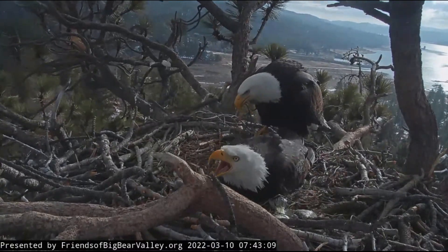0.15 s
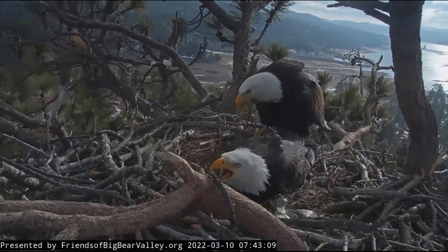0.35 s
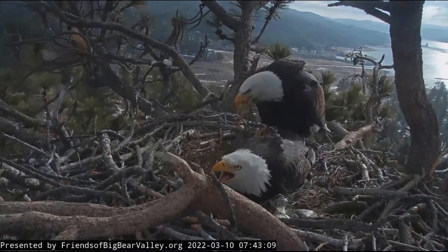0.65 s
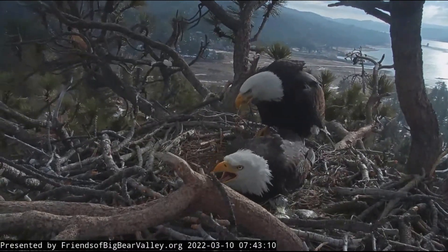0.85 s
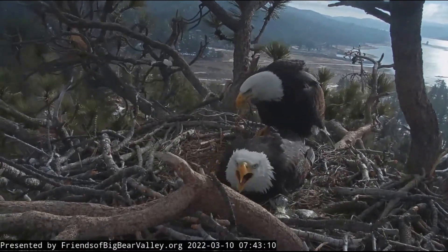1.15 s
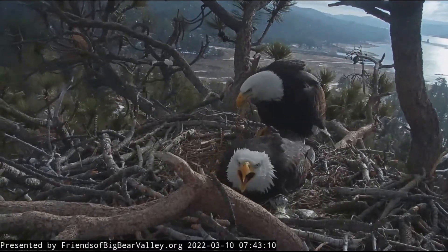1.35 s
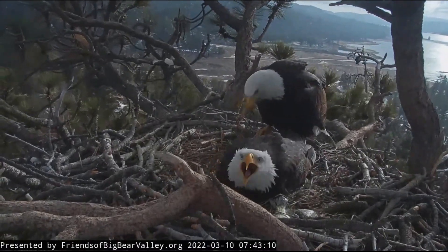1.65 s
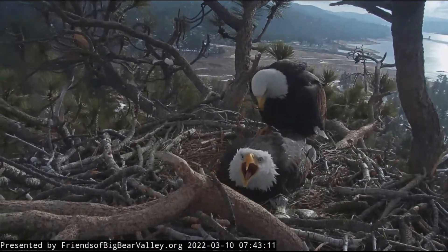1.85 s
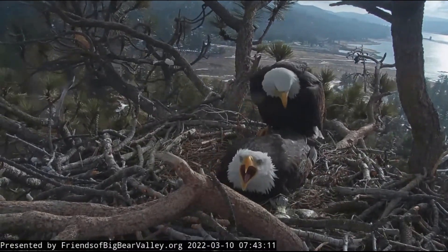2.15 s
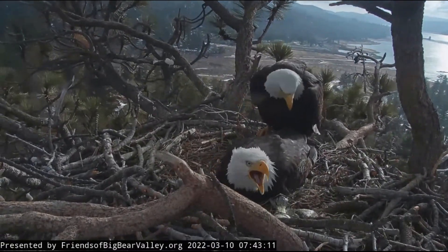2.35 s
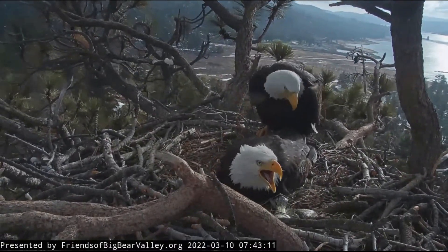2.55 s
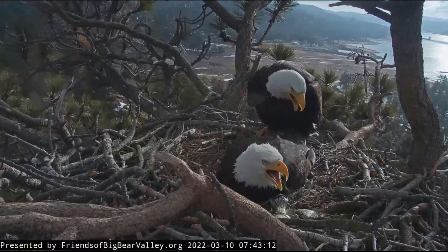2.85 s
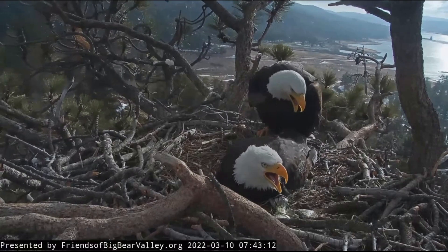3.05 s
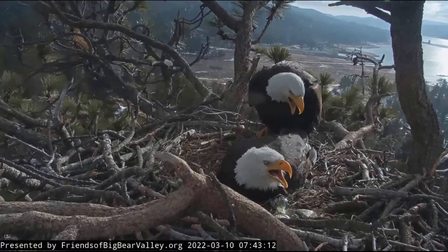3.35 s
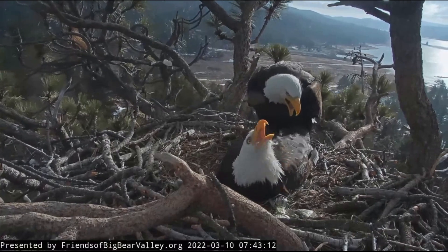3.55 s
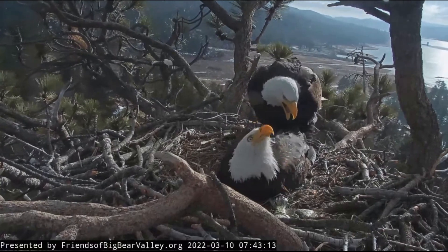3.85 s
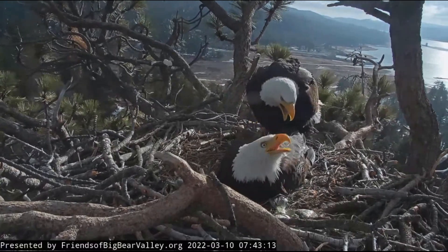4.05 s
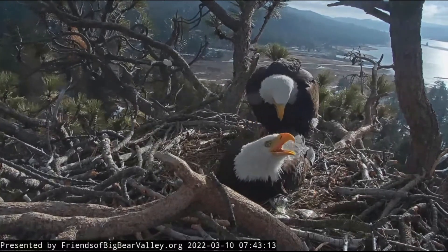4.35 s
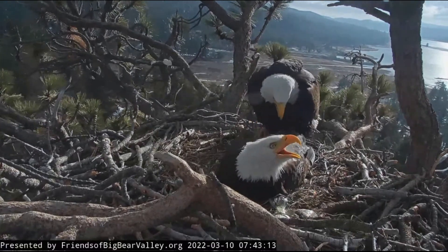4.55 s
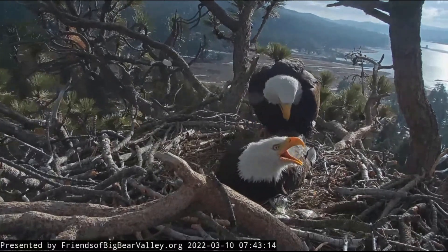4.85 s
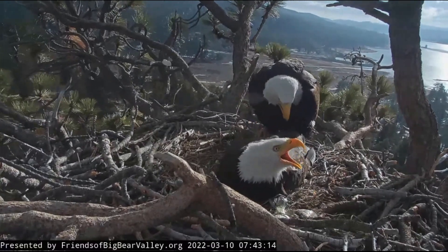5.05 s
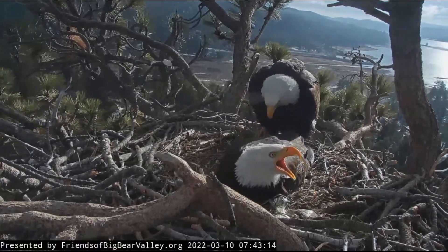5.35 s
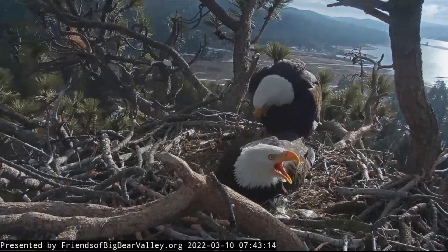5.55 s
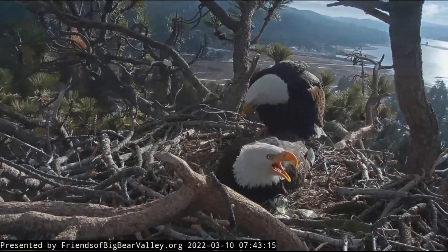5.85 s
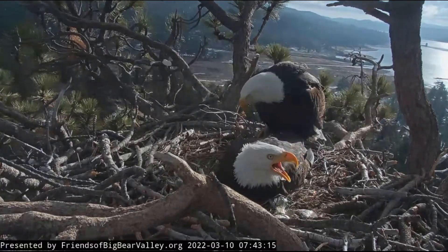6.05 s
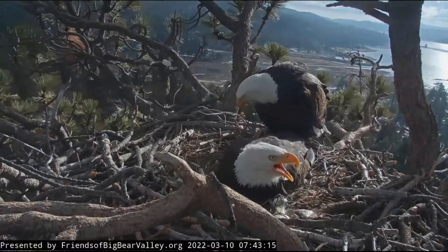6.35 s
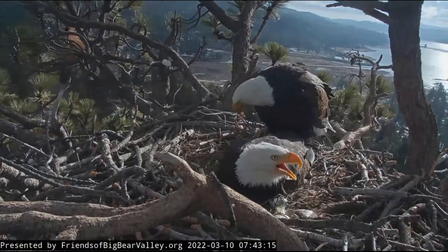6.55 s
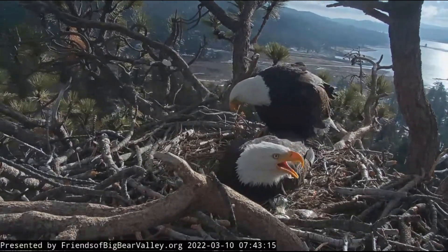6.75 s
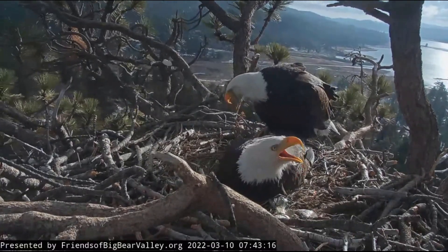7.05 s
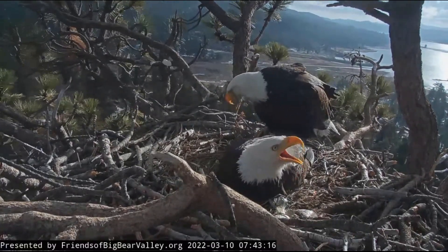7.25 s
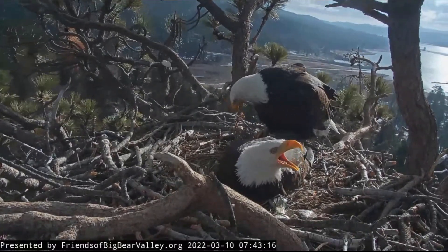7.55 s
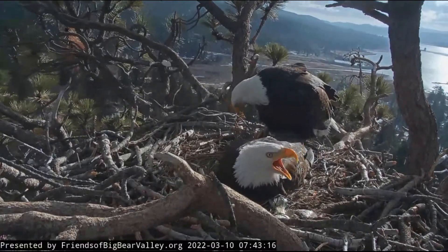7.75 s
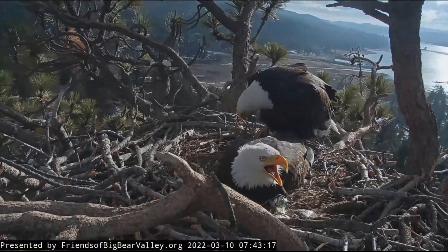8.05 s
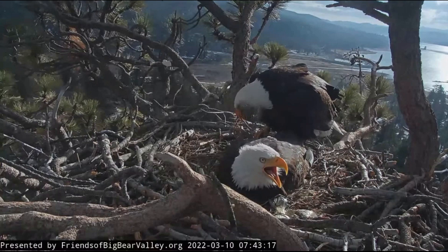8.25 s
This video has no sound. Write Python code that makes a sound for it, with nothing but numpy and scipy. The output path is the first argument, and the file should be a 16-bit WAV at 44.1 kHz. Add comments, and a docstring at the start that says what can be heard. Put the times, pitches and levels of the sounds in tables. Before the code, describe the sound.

A close outdoor microphone at a treetop nest catches an eagle whose loudest notes overdrive it. From 0.1 to 0.7 s, two thin whistles lead into six rapid raspy chirps, about ten a second, falling from squeal to croak, with small peeps after. Wind rumble and airy rush swell; sticks tick in quick runs near 1.5 s. At 2.2 s a clear high whistle starts a louder bout, ending in piercing peeps by 3 s as the gust peaks. Hoarse short yelps come at 3.2 and 3.5 s, then a brief harsh chirp burst at 3.7 s with a low rough clack. Yelps and faint squeaks continue from 4 to 5 s among twig clicks. The strongest chatter runs 5.4 to 6.3 s with sharp peeps; a weak chirp follows at 6.5. Wind eases and sticks tick. At 7.6 s a bright whistle opens the final raspy bout, peeping until 8.4 s.

```python
"""In a tall pine an eagle calls on its nest, close to a fixed microphone that its loudest notes overdrive.
High whistles, near-pure tones, lead into bouts of raspy chirps: paired pitch sweeps with a throat-filtered rasp.
The chirps sink from a squeal to a croak, and most bouts end in piercing peeps, arching tones.
Lower yelps, built from odd and then even harmonics, and faint squeaks come mostly between the bouts.
Filtered noise makes the wind's rush and rumble; decaying noise bursts make the nest's sticks tick, clack and crack."""
import sys
import numpy as np
from scipy import signal
from scipy.fft import rfft, irfft, next_fast_len
from scipy.io import wavfile
from scipy.ndimage import uniform_filter1d, map_coordinates

SR = 44100
rng = np.random.default_rng(int(sys.argv[2]) if len(sys.argv) > 2 else 0)


def output_pcm(signal):
    """Save a mono or channel-first signal as 16-bit PCM at the path in sys.argv[1].

    Samples are clipped to [-1, 1] before scaling.
    """
    pcm = np.clip(np.atleast_2d(signal).T, -1, 1) * 32767
    wavfile.write(sys.argv[1], SR, np.round(pcm).astype(np.int16))


N = 371322

# Wind pressure on the microphone. Each row: time in seconds, level in dB.
BUFFET_LEVELS = [(0, -78), (.33, -62.5), (.6, -46.5), (.8, -53.5), (1.05, -47.5), (1.6, -44.5),
                 (2.15, -50.5), (2.47, -43), (3.02, -40), (3.27, -48), (3.7, -59), (4.0, -49), (4.25, -54),
                 (4.6, -51), (5.5, -55.5), (5.87, -51.5), (6.5, -59), (8.42, -63)]
# Wind in the crown. Each row: time in seconds, level in dB.
BREEZE_LEVELS = [(0, -56.5), (.7, -52), (1.1, -50.5), (1.62, -45), (2.05, -48), (2.45, -46), (2.95, -43.5),
                 (3.4, -49.5), (4.2, -53.5), (4.7, -52.5), (5.2, -54.5), (5.8, -53.5), (6.9, -58),
                 (8.42, -53.5)]
# Noise spectrum of strong buffeting. Each row: frequency in Hz, relative density in dB.
RUMBLE_SPECTRUM = [(20, -31), (35, 1), (60, -6.5), (90, -1), (160, -5.5), (250, -15.5), (500, -27.5),
                   (900, -46)]
# Noise spectrum of air rushing through the crown. Each row: frequency in Hz, relative density in dB.
RUSH_SPECTRUM = [(180, -38), (300, -13.5), (477, -10), (630, -6.5), (823, -5.5), (1010, -4.5), (1610, -6.5),
                 (2280, -5), (2880, 0.5), (3090, -1), (4800, -30), (6240, -81), (10600, -120)]
# Noise spectrum of the hissing needles. Each row: frequency in Hz, relative density in dB.
NEEDLE_SPECTRUM = [(3500, -7), (4600, -7), (5800, 4), (7200, -12.5), (8500, -16), (13000, -30),
                   (15000, -38)]
# Noise spectrum of the steady microphone hiss. Each row: frequency in Hz, relative density in dB.
MIC_HISS_SPECTRUM = [(100, 19.5), (8000, 1.5), (13500, 1), (14500, -23), (15300, -37)]
# Single ticks and cracks of the sticks. Each row: start in seconds, level in dB, extra level of the tick in dB.
STICK_HITS = [(0.0523, -39.5, -3.5), (1.8083, -34, -13), (4.2028, -34, -9.5), (4.9107, -35.5, -7),
              (5.0669, -32.5, -6.5), (6.5226, -34.5, -26), (6.5944, -35, -8.5), (6.837, -54, 2),
              (7.383, -41, -22), (7.5044, -34, -8.5)]
# Quick runs of stick ticks, or of low rough clacks. Each row: start in seconds, number of hits, gap in seconds,
# level in dB, extra level of the tick in dB.
STICK_RUNS = [(1.4536, 4, .0408, -33.5, -6.5), (1.606, 4, .0415, -31, -7.5), (3.8018, 4, 0.011, -23, -47)]
# Noise spectrum of a thin stick's tick. Each row: frequency in Hz, relative density in dB.
TWIG_SPECTRUM = [(2500, 1), (4300, 6), (6500, 5), (7400, 1), (8200, -18), (14000, -29)]
# Noise spectrum of sticks knocking. Each row: frequency in Hz, relative density in dB.
KNOCK_SPECTRUM = [(100, -16), (700, -15.5), (1500, -10), (2600, 0), (3300, -1), (4500, -34)]
# Whistles. Each row: start in seconds, length in seconds, first pitch in Hz, last pitch in Hz, level in dB.
WHISTLE_NOTES = [(0.069, 0.039, 4185, 4013, -31), (0.099, 0.053, 4130, 4050, -34),
                 (0.552, 0.018, 5640, 5160, -46), (0.561, 0.022, 4050, 3480, -47),
                 (2.212, 0.042, 4430, 4100, -49), (2.244, .04, 4050, 3885, -23),
                 (2.624, 0.026, 4060, 4200, -35), (2.735, 0.048, 4180, 3860, -32),
                 (3.675, 0.034, 3540, 4056, -29), (3.697, .028, 5000, 4920, -47.5),
                 (3.717, 0.0198, 3490, 3000, -31), (3.735, 0.05, 2400, 2570, -40),
                 (5.375, 0.043, 5150, 5900, -59), (5.377, 0.068, 4760, 4500, -44.5),
                 (5.768, 0.043, 4240, 3970, -45.5), (5.881, 0.044, 4190, 3950, -29.5),
                 (6.006, 0.041, 4090, 4130, -37), (7.546, .06, 1290, 1384, -44.5),
                 (7.598, 0.07, 3970, 4170, -23), (7.662, 0.0083, 3970, 3740, -28),
                 (7.915, 0.019, 4150, 4310, -33), (8.03, 0.039, 4245, 4200, -25.5)]
# Raspy chirps. Each row: time in seconds, strength in dB.
CHIRP_NOTES = [(0.147, -5.5), (0.241, -5), (0.338, -7), (0.442, -6), (0.546, -11.5), (0.659, -7.5),
               (2.3, -3.5), (2.397, -2.5), (2.498, -1.5), (2.614, 1), (2.737, -1), (2.857, 0), (3.689, -2),
               (3.727, -5.5), (3.785, 2), (5.435, -3.5), (5.459, 2.5), (5.551, 2.5), (5.652, .5),
               (5.762, 3.5), (5.883, 1), (5.907, -2.5), (6.004, 2), (6.121, -0.5), (6.246, -9.5),
               (6.494, -9.5), (7.703, 1.5), (7.804, 0.5), (7.915, -1), (8.031, 4), (8.057, -10.5),
               (8.163, 0), (8.298, -6.5)]
# Bouts of chatter. Each row: start in seconds, time until the voice drops in seconds, squeal and rasp gain in dB.
CHATTER_BOUTS = [(0.1, 0.23, 2), (2.251, 0.26, 1), (3.75, .12, -10.5), (5.401, 0.31, -3), (7.652, 0.23, -1)]
# Resonances of windpipe and open beak. Each row: centre in Hz, width in Hz, gain in dB.
THROAT_RESONANCES = [(2235, 25, 5.5), (2815, 464, 1.5), (3310, 150, 5), (4200, 160, 2), (5160, 43, 3.5),
                     (5960, 230, 11), (6950, 300, 12.5)]
# Peeps, from faint squeaks to piercing cries. Each row: start in seconds, length in seconds, pitch in Hz, level in dB.
PEEP_NOTES = [(0.663, 0.027, 3368, -19.5), (0.778, 0.015, 3270, -20), (2.852, 0.046, 3267, -15.5),
              (2.978, 0.013, 3235, -22.5), (3.037, 0.072, 3114, -37), (3.15, 0.048, 3530, -44),
              (3.474, 0.033, 3300, -41), (3.499, 0.026, 3580, -44.5), (4.228, 0.021, 3260, -38),
              (4.388, 0.021, 3190, -42.5), (4.739, 0.022, 3110, -45.5), (5.242, .043, 3030, -42.5),
              (5.28, 0.022, 3116, -40.5), (5.309, 0.017, 2230, -45), (5.353, 0.02, 1430, -50),
              (5.875, 0.031, 3310, -27), (6.004, 0.033, 3340, -14), (6.126, 0.035, 3244, -14),
              (6.252, 0.018, 3210, -16.5), (8.156, 0.058, 3425, -15), (8.298, 0.045, 3247, -12)]
# Yelps. Each row: start in seconds, length in seconds, last pitch in Hz, odd-harmonic level in dB,
# even-harmonic level in dB, extra gain of the second harmonic in dB.
YELP_NOTES = [(3.198, 0.0364, 560, -33, -32, 1.5), (3.546, 0.087, 537, -33, -31, -0.5),
              (3.967, 0.045, 490, -40.5, -33, -5), (4.281, 0.045, 590, -35, -47.5, 3),
              (4.414, 0.061, 604, -28.5, -26, -10.5), (4.78, 0.068, 710, -39, -62, 2),
              (4.895, 0.1, 745, -45, -66, 0), (4.983, 0.0408, 480, -40.5, -34.5, -6),
              (6.354, 0.0227, 604, -57, -31.5, 2), (7.532, 0.023, 644, -61, -42, 7),
              (7.554, .028, 715, -59, -37.5, 4)]
# Odd harmonics of a yelp. Each row: harmonic number, relative level in dB.
YELP_ODD_HARMONICS = [(3, -8), (5, -3), (7, -33), (9, -27), (11, -53)]
# Even harmonics of a yelp. Each row: harmonic number, relative level in dB.
YELP_EVEN_HARMONICS = [(2, -5.5), (4, 2.5), (6, -22.5), (8, -30), (10, -31)]
# Echoes from trunk and branches. Each row: delay in seconds, level in dB.
BRANCH_ECHOES = [(.0085, -13), (0.0146, -48), (0.02, -25.5)]

DROP_S = 0.0384  # how gradually the voice drops within a bout
SQUEAL_HZ, SQUEAL_DROP_HZ = 6143, 848  # pitch of the early squeals, and how far it sinks
# after the drop the squeal dies first, the rasp later
SQUEAL_FADE_DB_PER_S, RASP_FADE_DB_PER_S, RASP_HOLD_S = 132, 54, 0.032
CROAK_GAIN_DB = 6.5  # the croak takes over as the voice drops
PEEP_SAG = 0.055  # share of its pitch that a peep loses by its end
YELP_HZ = 651.5  # every yelp starts from this pitch
TOP_HZ = 15850  # upper band limit of the microphone signal


def amp(db):
    """Level law: decibels to amplitude gain."""
    return 10 ** (np.asarray(db) / 20)


def unit(x):
    """Normalisation: scale to rms 1."""
    return x / np.sqrt(np.mean(x ** 2) + 1e-20)


def add(track, s, sound):
    """Superposition: mix a sound into the track at s seconds."""
    i = max(round(s * SR), 0)
    track[i:i + len(sound)] += sound[:len(track) - i]


def wobble(rate, n):
    """Band-limited fluctuation: a smooth random curve with rate knots a second."""
    knots = rng.standard_normal(int(n * rate / SR) + 4)
    return map_coordinates(knots, [np.arange(n) * rate / SR])


def filtered(x, response):
    """Linear filtering: the spectrum of x times a response of frequency."""
    m = next_fast_len(len(x) + SR // 10)
    return irfft(rfft(x, m) * response(np.fft.rfftfreq(m, 1 / SR)), m)[:len(x)]


def noise(spectrum, n):
    """Spectral shaping: white noise coloured by (Hz, dB) points, at rms 1."""
    f, db = np.transpose(spectrum)

    def response(hz):
        return amp(np.interp(np.log(hz + 1), np.log(f), db, right=-120))

    return unit(filtered(rng.standard_normal(n), response))


def phase(hz):
    """Frequency modulation: phase is the running integral of a changing pitch."""
    return 2 * np.pi * np.cumsum(hz) / SR


def swell(t, centre, width):
    """Gaussian envelope: a bell-shaped rise and fall."""
    return np.exp(-.5 * ((t - centre) / width) ** 2)


def wind(rumble_db=-1, rush_db=1, needles_db=-58, needles_growth=2.17, crackle_db=3, lumps_db=3.0,
         flutter_db=0.55, hiss_db=-65.5):
    """Turbulence: gusts buffet the microphone and rush through the needles, over a steady faint hiss."""
    t = np.arange(N) / SR
    buffet = np.interp(t, *np.transpose(BUFFET_LEVELS))
    breeze = np.interp(t, *np.transpose(BREEZE_LEVELS))
    # stronger gusts shed smaller eddies, so the rumble rises in pitch
    strength = np.clip((buffet + 56) / 10, 0, 1)
    small_eddies = np.sqrt(strength) * noise(RUMBLE_SPECTRUM, N)
    deep_spectrum = [(20, -0.5), (70, 4.0), (130, -6.5), (250, -22.0), (500, -40)]
    large_eddies = np.sqrt(1 - strength) * noise(deep_spectrum, N)
    eddies = (small_eddies + large_eddies) * amp(lumps_db * wobble(22, N))
    rumble = amp(buffet + rumble_db) * unit(eddies)
    air = amp(breeze + rush_db + flutter_db * wobble(25, N)) * noise(RUSH_SPECTRUM, N)
    # the needles' hiss and crackle grow faster than the wind, so they stand out near the top of a gust
    crackle = unit(amp(crackle_db * wobble(700, N)) * noise(NEEDLE_SPECTRUM, N))
    fizz = amp(needles_db + needles_growth * (breeze - breeze.max())) * crackle
    return rumble + air + fizz + amp(hiss_db) * noise(MIC_HISS_SPECTRUM, N)


def stick_hits(scatter=0.0195, scatter_db=-1.5):
    """Repeated impact: single hits and slightly uneven quick runs, as (start s, level dB, extra tick dB)."""
    hits = list(STICK_HITS)
    for s, count, gap, db, treble_db in STICK_RUNS:
        for k in range(round(count)):
            when = s + gap * (k + scatter * rng.standard_normal())
            hits.append((when, db + scatter_db * rng.standard_normal(), treble_db))
    return hits


def sticks(tick_t60=0.021, knock_t60=0.056, tick_db=-4, knock_db=-8, faint_db=-58, count=22):
    """Impact and damping: dry sticks knock, thin ones add a bright tick, and faint clicks scatter at random."""
    out = np.zeros(N)
    t = np.arange(SR // 20) / SR
    for s, db, treble_db in stick_hits():
        tick = amp(tick_db + treble_db - 60 * t / tick_t60) * noise(TWIG_SPECTRUM, len(t))
        knock = amp(knock_db - 60 * t / knock_t60) * noise(KNOCK_SPECTRUM, len(t))
        add(out, s, amp(db) * (tick + knock))
    for when, weight in rng.random((count, 2)):
        click = amp(faint_db + 5.3 * weight - 60 * t / 0.0017) * noise(TWIG_SPECTRUM, len(t))
        add(out, when * N / SR, click)
    return out


def syrinx(hz, db, octave_db=-29, rasp_db=-25):
    """Self-sustained oscillation: a nearly pure tone with a quick tremor and a faint rasp on it."""
    n = len(hz)
    jitter, flutter_db = .008, .9  # share of the pitch; dB
    turn = phase(hz * (1 + jitter * wobble(341, n)))
    rasp = amp(rasp_db) * wobble(2200, n) * np.cos(turn)
    tone = np.sin(turn) + amp(octave_db) * np.sin(2 * turn) + rasp
    return np.sqrt(2) * amp(db + flutter_db * wobble(244, n)) * tone


def whistles(arch=0.019, edge=0.76, broken_db=3.5, broken_rate=190):
    """Pitch glide: thin arching notes, nearly all high, open a bout, sound on through it or join into a wail."""
    out = np.zeros(N)
    for s, length, first_hz, last_hz, db in WHISTLE_NOTES:
        u = np.linspace(0, 1, round(length * SR))
        hz = (first_hz + (last_hz - first_hz) * u) * (1 + arch * np.sin(np.pi * u))
        # a whistle that starts together with a chirp is shaken by it
        shaken = any(abs(s - chirp_s) < .016 for chirp_s, _ in CHIRP_NOTES)
        level = db + shaken * broken_db * wobble(broken_rate, len(u))
        note = syrinx(hz, level, octave_db=-26, rasp_db=-19 if shaken else -28)
        add(out, s, note * signal.windows.tukey(len(u), edge))
    return out


def throat(hz):
    """Resonance: parallel band-pass modes of the windpipe and the open beak, alternating in sign."""
    response = 0
    for k, (centre, width, db) in enumerate(THROAT_RESONANCES):
        damping = 1j * hz * width
        response = response + (-1) ** k * amp(db) * damping / (centre * centre - hz * hz + damping)
    return response


def chirp_voice(s):
    """Register change: squeal Hz and squeal, croak and rasp dB at time s, as a bout drops to a croak."""
    start, high_s, bright_db = [bout for bout in CHATTER_BOUTS if bout[0] <= s][-1]
    late = s - start - high_s
    dropped = (1 + np.tanh(late / (2 * DROP_S))) / 2
    squeal_hz = SQUEAL_HZ - SQUEAL_DROP_HZ * dropped
    squeal_db = bright_db - SQUEAL_FADE_DB_PER_S * max(late, 0)
    rasp_db = bright_db - RASP_FADE_DB_PER_S * max(late - RASP_HOLD_S, 0)
    return squeal_hz, squeal_db, CROAK_GAIN_DB * dropped, rasp_db


def chirps(squeal_s=0.0032, croak_s=0.0029, squeal_fall=13, croak_rise=38, squeal_rough=0.055, croak_rough=0.12,
           squeal_db=-28, croak_db=-34, scrape_db=-42, tail_db=-45, tail_s=0.0485, throb_rate=60, throb_db=6.0):
    """Two-voiced source and filter: a falling squeal and rising croak snap open, then trail off in a rasp."""
    out = np.zeros(N)
    lead = .015  # seconds before the snap
    t = np.arange(SR // 10) / SR - lead
    n = len(t)
    glide = lead * np.tanh(t / lead)  # the sweeps level off away from the snap
    scrape_spectrum = [(300, 0), (1000, 6.0), (2200, 23.5), (3500, 8.5), (4600, 3), (6000, -26.0), (8000, -12)]
    for s, strength_db in CHIRP_NOTES:
        hz, high_db, low_db, rasp_db = chirp_voice(s)
        # the two sides of the syrinx sweep in opposite directions, both unsteadily
        squeal_hz = hz * np.exp(-squeal_fall * glide) * (1 + squeal_rough * wobble(2920, n))
        croak_hz = 2700 * np.exp(croak_rise * glide) * (1 + croak_rough * wobble(2470, n))
        squeal = amp(high_db + squeal_db) * np.sin(phase(squeal_hz))
        croak = amp(croak_db) * np.sin(phase(croak_hz))
        scrape = amp(scrape_db) * noise(scrape_spectrum, n)
        attack = squeal * swell(t, 0, squeal_s)
        attack += amp(low_db) * (croak + scrape) * swell(t, 0.0034, croak_s)

        # the rasp rings in the throat and reaches only a little higher than the squeal
        def reach(f):
            return 1 / (1 + (f / (1.078 * hz)) ** 20)

        hiss = unit(filtered(rng.standard_normal(n), lambda f: throat(f) * reach(f)))
        # its voiced part is a set of wavering partials that sink together as the note fades
        sink = np.exp(-.8 * (t - tail_s / 2))
        partials = [amp(db) * reach(centre) * np.sin(phase(centre * sink + width * wobble(452.0, n)))
                    for centre, width, db in THROAT_RESONANCES]
        rasp = unit(unit(sum(partials)) + hiss)
        onset = np.clip(t / 0.0021, 0, 1)
        decay = amp(-110 * (t - tail_s / 2) + 4.1 * wobble(104, n))  # 110 dB per second, unsteady
        shape = onset * decay / (1 + (t / tail_s) ** 10)
        # each chirp throbs at its own rate
        throb_hz = throb_rate * (1 + 0.24 * rng.standard_normal())
        throb = amp(throb_db * np.cos(2 * np.pi * t * throb_hz))
        tail = amp(rasp_db + tail_db) * rasp * shape * throb
        add(out, s - lead, amp(strength_db) * (attack + tail))
    return out


def peeps(arch=.018, edge=0.98):
    """Pressure-dependent pitch: short notes arch a little as the pressure swells, then sag."""
    out = np.zeros(N)
    for s, length, hz, db in PEEP_NOTES:
        u = np.linspace(0, 1, round(length * SR))
        bend = 1 + arch * np.sin(np.pi * u) - PEEP_SAG * u ** 2
        add(out, s, syrinx(hz * bend, db) * signal.windows.tukey(len(u), edge))
    return out


def yelps(flutter_db=2, rough=.25, arch=0.018, odd_at=0.32, odd_width=0.16, even_at=0.61, even_width=0.15):
    """Harmonic series: odd harmonics peak first, then the voice flips up an octave onto the even ones."""
    out = np.zeros(N)
    for s, length, last_hz, odd_db, even_db, second_db in YELP_NOTES:
        n = round(length * SR)
        u = np.linspace(0, 1, n)
        hz = (YELP_HZ + (last_hz - YELP_HZ) * u ** 2) * (1 + arch * np.sin(np.pi * u))
        turn = phase(hz * (1 + .017 * wobble(600, n)))
        odd = sum(amp(db) * np.sin(round(k) * turn) for k, db in YELP_ODD_HARMONICS)
        even = sum(amp(db + second_db * (round(k) == 2)) * np.sin(round(k) * turn)
                   for k, db in YELP_EVEN_HARMONICS)
        voice = amp(odd_db) * swell(u, odd_at, odd_width) * odd
        voice += amp(even_db) * swell(u, even_at, even_width) * even
        hoarse = amp(flutter_db * wobble(315, n)) * (1 + rough * wobble(1091, n))
        add(out, s, np.sqrt(2) * voice * hoarse * signal.windows.tukey(n, .2))
    return out


def treetop(x, t60=0.13, wet_db=-33):
    """Reflection and scattering: trunk and branches give quick echoes, the crown a faint short tail."""
    t = np.arange(SR // 2) / SR
    tail = noise([(300, -36), (3500, -13), (6000, 34), (12000, -14)], len(t)) * amp(-60 * t / t60)
    response = amp(wet_db) * tail / np.linalg.norm(tail)
    response[0] = 1  # direct sound
    for delay, db in BRANCH_ECHOES:
        response[round(delay * SR)] += amp(db)
    return signal.fftconvolve(x, response)[:N]


def scene():
    """Superposition: eagle and sticks share the treetop's echoes, and the wind is added without them."""
    eagle = whistles() + chirps() + peeps() + yelps()
    return (treetop(eagle + sticks()) + wind())[None]


def record(dry, ceiling=0.076, lopsided=0.66, knee=0.12):
    """Nonlinear distortion: the preamplifier clips; overdrive shifts its bias, adding even harmonics and a thump."""
    x = signal.resample_poly(dry[0], 2, 1)  # doubled rate limits aliasing
    drive = np.sqrt(2 * np.abs(uniform_filter1d(x ** 2, size=180)))  # running level over about 2 ms
    x = x + lopsided * np.maximum(drive - knee, 0)
    clipped = x / (1 + np.abs(x / ceiling) ** 10) ** (1 / 10)
    x = signal.resample_poly(clipped, 1, 2)
    coupled = filtered(x, lambda hz: 1j * hz / (1j * hz + 24))  # high-pass at 24 Hz
    return filtered(coupled, lambda hz: hz < TOP_HZ)[None]


dry = scene()
out = record(dry)
output_pcm(out)
```